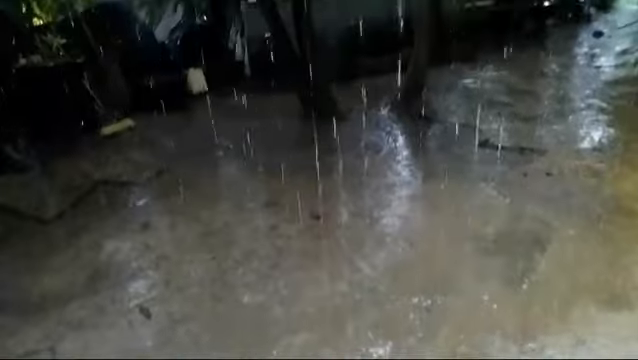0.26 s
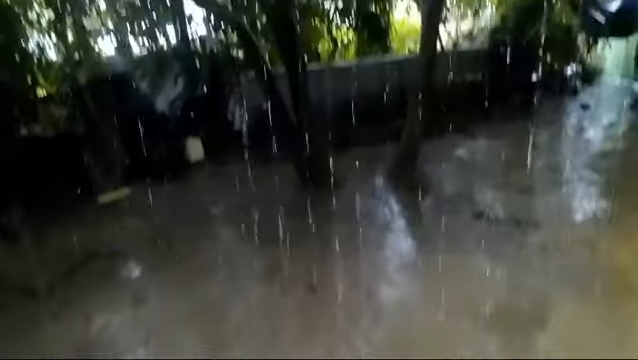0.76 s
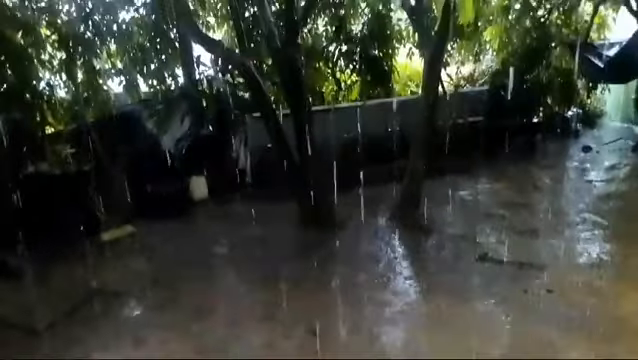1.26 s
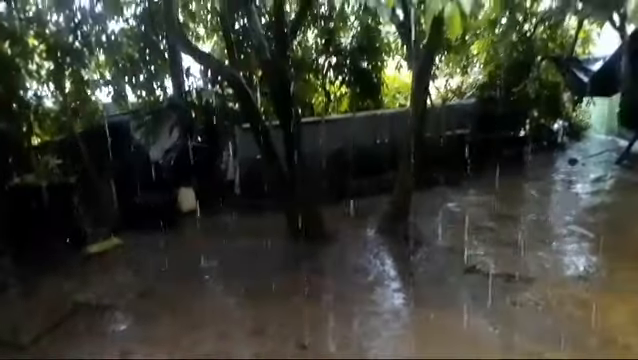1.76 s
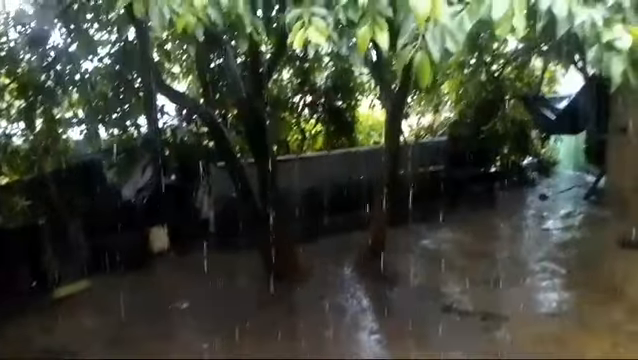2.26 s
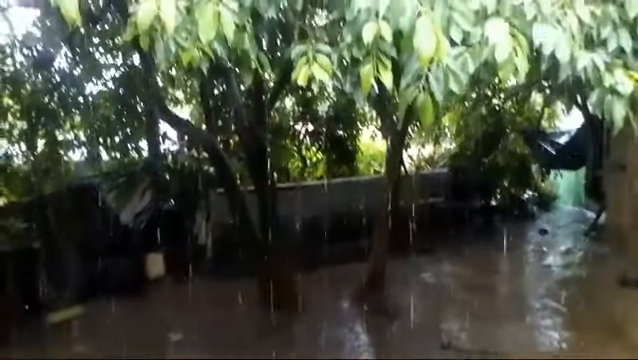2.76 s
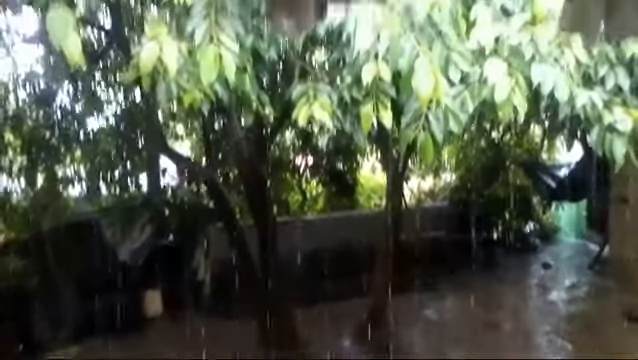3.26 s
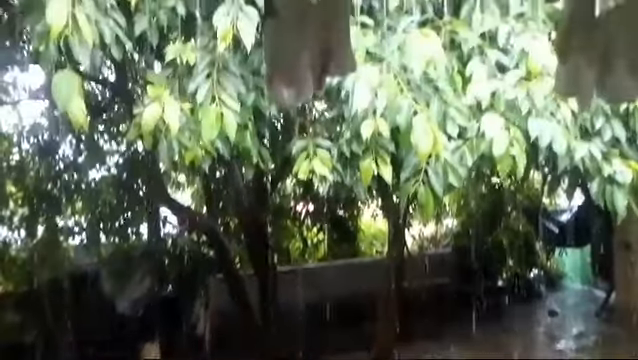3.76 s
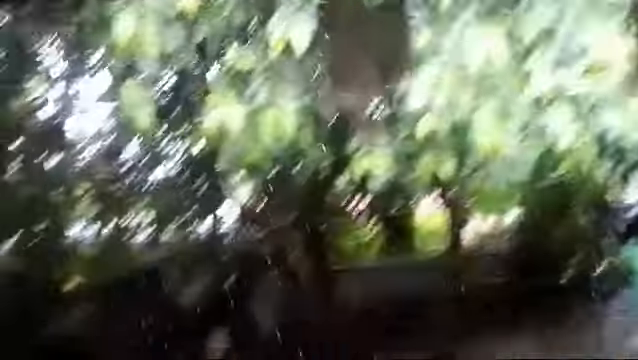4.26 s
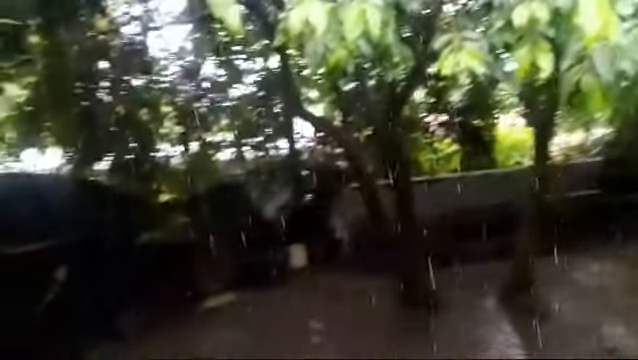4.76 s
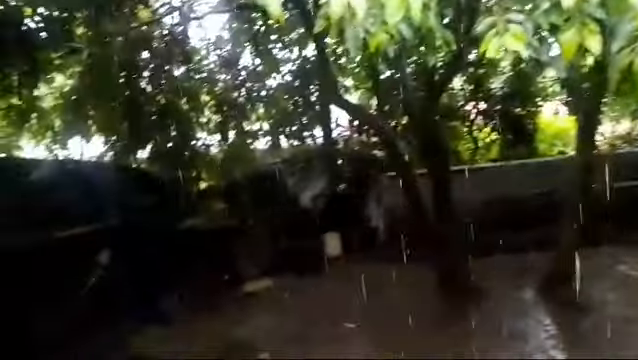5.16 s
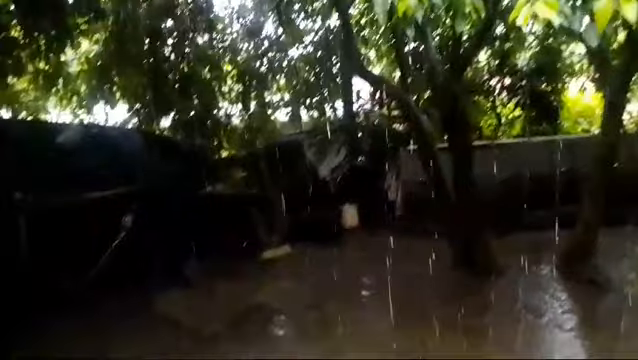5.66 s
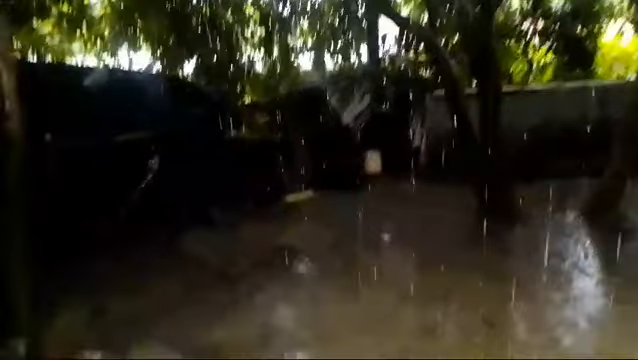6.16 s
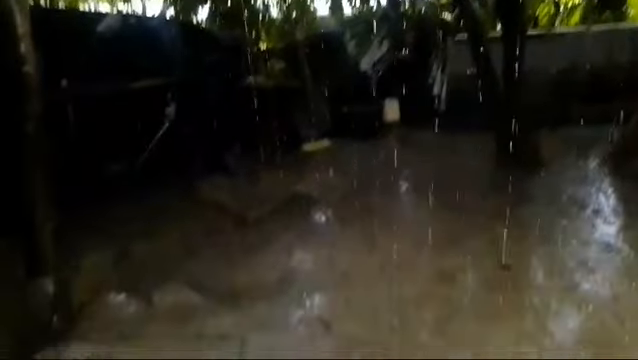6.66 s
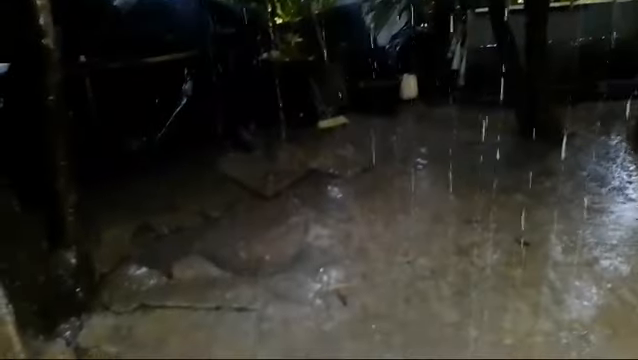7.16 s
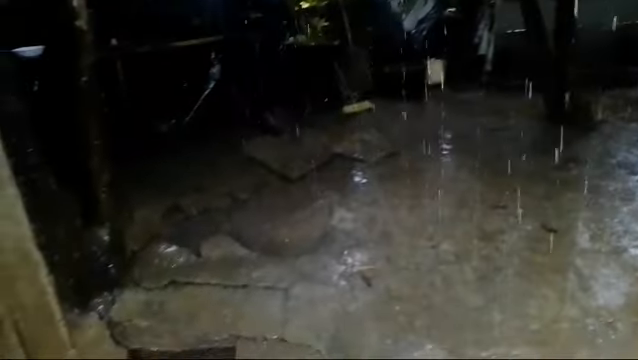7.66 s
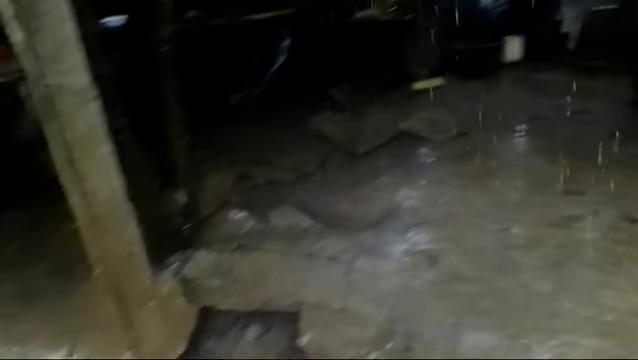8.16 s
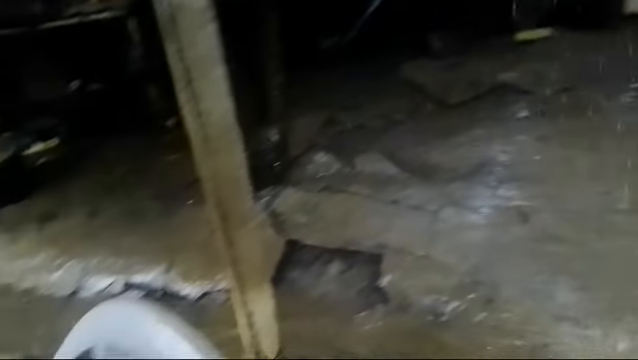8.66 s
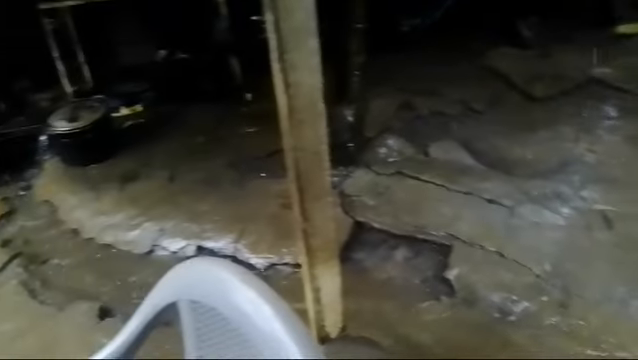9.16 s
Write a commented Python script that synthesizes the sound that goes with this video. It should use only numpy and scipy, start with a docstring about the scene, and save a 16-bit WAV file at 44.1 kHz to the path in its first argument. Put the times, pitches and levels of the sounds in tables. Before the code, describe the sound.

A continuous downpour in a wet yard under a dripping roof edge. Bright white hiss and fine patter fill everything, while nearer drops give sharp wet slaps, short pitched plops and tiny clicks at uneven moments. The small microphone sounds thin and treble-heavy, with shimmering, almost whistling streaks that rise and fade, and fluttering midrange bands strongest in the first half. The rain never stops.

```python
"""Strings of water falling from a roof edge close to a small microphone, in heavy rain on a flooded yard.
Close by: slaps of decaying noise through a treble resonance, plops of noise around a pitch, short ticks.
All round: far drops merge into noise hiss; nearer ones patter, plop and splat as clumps of damped sines.
Rain and slaps share one colour through the microphone; treble streaks and narrow midrange bands swell and fade."""
import sys
import numpy as np
from scipy import signal
from scipy.fft import rfft, irfft, next_fast_len
from scipy.io import wavfile
from scipy.ndimage import uniform_filter1d, map_coordinates

SR = 44100
rng = np.random.default_rng(int(sys.argv[2]) if len(sys.argv) > 2 else 0)


def gain_from_decibels(decibels):
    """Convert decibel values to linear amplitude factors."""
    exponent = np.asarray(decibels, float) / 20
    return 10 ** exponent


def wav_record(signal):
    """Record a signal, one row per channel, as 16-bit PCM in the file named by sys.argv[1]."""
    frames = np.transpose(np.atleast_2d(signal))
    bounded = np.clip(frames, -1, 1)
    # unit amplitude maps onto the largest positive 16-bit level
    quanta = np.round(bounded * 32767).astype(np.int16)
    wavfile.write(sys.argv[1], SR, quanta)


N = 415415

# Strength of the rain all round, before make-up gain: (t/s, relative level/dB)
RAIN_LEVEL = [(0.0, -52), (3.2, -52), (3.441, -51.5), (7.45, -53.5), (7.71, -53), (9.42, -54)]
# Colour of rain and slaps through the microphone, resonant near 8.5 kHz: (f/Hz, gain/dB)
MICROPHONE_COLOUR = [(32, -41), (44, -27), (60, -39), (100, -24.5), (155, -45), (200, -19.5), (310, -5.5),
                     (700, -4), (1200, -1), (1900, -0.5), (2600, -6), (3400, -7.5), (4700, -12),
                     (6300, -6.5), (7400, -1.5), (8600, -1.5), (10000, -3), (11500, -8), (15700, -13)]
# Course of the treble surges around the microphone's resonance: (t/s, lift/dB, centre f/Hz)
TREBLE_SURGES = [(0.0, 13.5, 8440), (0.34, 3, 8740), (0.63, 10, 8000), (0.83, 9.5, 9300), (1.0, 5.5, 8750),
                 (1.15, 9.5, 8250), (1.6, 11, 9000), (1.84, 14, 9000), (2.17, 10.5, 8500), (3.07, 3, 8730),
                 (3.67, 15, 9700), (4.14, 15.5, 9200), (4.36, 10.5, 8700), (4.42, 16.5, 8450),
                 (5.1, 8.5, 8930), (5.75, 12, 8760), (6.22, 7.5, 8300), (6.43, 12, 8500), (6.62, 7.5, 8450),
                 (6.93, 14, 8400), (7.26, 10, 7740), (7.75, 14.5, 8700), (8.16, 16, 8600),
                 (8.29, 10.5, 8600), (8.66, 10.5, 8540), (8.95, -1, 8700), (9.15, 6, 8650), (9.42, 3, 8400)]
# Strongest thin streaks inside the surges: (middle t/s, nominal length/s, f/Hz)
TREBLE_STREAKS = [(0.09, 0.18, 7300), (0.127, 0.26, 7770), (0.155, 0.39, 9170), (0.65, 0.41, 7920),
                  (0.84, 0.64, 9100), (1.3, 0.24, 8050), (1.65, 1.3, 9060), (1.72, 0.27, 9400),
                  (1.766, 3.3, 8530), (2.003, 0.19, 9260), (3.628, 0.43, 8190), (3.667, 0.64, 9340),
                  (3.682, 0.24, 9770), (3.8, 1.6, 9600), (3.89, 2.3, 8970), (4.19, 0.97, 8030),
                  (4.197, 1.4, 8670), (4.58, 0.38, 9320), (4.645, 0.58, 8260), (5.447, 0.23, 7020),
                  (5.674, 1.2, 8420), (5.682, 0.36, 9060), (6.473, 0.35, 9140), (6.74, 0.42, 7110),
                  (6.864, 0.52, 8220), (6.916, 0.53, 8630), (6.98, 0.34, 7900), (7.566, 1.8, 8750),
                  (7.61, 2.2, 8920), (7.71, 0.93, 7200), (7.89, 0.46, 7520), (7.886, 1.7, 8120),
                  (7.96, 0.45, 9160), (8.09, 0.33, 9350), (8.362, 0.81, 7820), (8.57, 0.68, 8630)]
# Narrow midrange swells of the rain noise: (middle t/s, length/s, f/Hz, lift/dB)
NARROW_SWELLS = [(0.018, 0.38, 1454, 11), (0.03, 0.22, 1910, 9), (0.254, 0.33, 2190, 9),
                 (0.547, 0.25, 1680, 5.5), (0.837, 0.15, 1740, 8.5), (0.9, 0.08, 1400, 8),
                 (1.262, 0.16, 2140, 6.5), (1.4, 0.11, 1760, 3), (1.427, 0.077, 1314, 6),
                 (1.707, 0.17, 1600, 9), (1.764, 0.16, 1220, 8), (2.28, 0.37, 1594, 13),
                 (2.58, 0.23, 1230, 12), (3.153, 0.28, 855, 9.5), (3.313, 0.25, 1844, 19),
                 (3.3, 0.3, 2160, 9), (3.378, 0.37, 1334, 14), (3.59, 0.19, 1744, 14.5),
                 (3.923, 0.18, 1254, 11), (4.035, 0.36, 1780, 14), (4.487, 0.37, 1790, 16),
                 (4.455, 0.062, 1500, 17.5), (4.26, 0.55, 1304, 8), (4.648, 0.2, 1435, 11),
                 (4.794, 0.25, 2160, 7), (4.81, 0.13, 1720, 16.5), (4.97, 0.26, 1770, 10),
                 (5.367, 0.34, 1540, 5.5), (5.785, 0.055, 1970, 8), (5.813, 0.11, 1380, 9),
                 (7.073, 0.15, 1550, 13.5), (7.432, 0.11, 1710, 8), (8.44, 0.2, 1720, 6.5),
                 (8.73, 0.1, 1400, 6), (8.816, 0.11, 1710, 1), (9.07, 0.064, 2110, 8)]
# Faint random swells all along, a single row: (centre f/Hz, width/Hz, lift/dB)
FAINT_SWELLS = (1500, 2060, -3)
# Loudest slaps in the treble spray, before the colour: (t/s, relative level/dB)
SLAPS = [(0.3826, -21), (1.0918, -23), (1.794, -18.5), (2.143, -19.5), (3.028, -21), (3.6023, -19),
         (3.7413, -16), (3.886, -20), (4.018, -33), (4.108, -19), (4.4105, -18.5), (4.443, -24),
         (4.55, -19.5), (4.7128, -21), (4.9944, -15), (6.3147, -20), (6.415, -19), (6.886, -22.5),
         (7.333, -22), (7.685, -24), (7.7126, -15.5), (7.877, -18), (7.964, -15), (8.1435, -23.5),
         (8.594, -23), (8.8034, -20)]
# Drops that plop into a puddle: (t/s, f/Hz, relative level/dB)
PUDDLE_PLOPS = [(1.135, 2490, -37.5), (1.638, 5800, -39.5), (2.143, 3460, -37), (2.529, 2480, -34),
                (2.563, 6000, -39), (3.003, 3800, -37), (3.028, 3730, -33.5), (4.369, 5840, -40.5),
                (4.5336, 4170, -35), (4.9696, 6300, -36), (4.9944, 4800, -36.5), (5.248, 3980, -38.5),
                (5.8574, 3950, -41), (6.171, 3300, -34), (6.311, 2600, -39), (6.448, 6380, -36),
                (6.565, 5900, -40.5), (7.024, 3680, -41), (7.592, 3120, -34), (7.713, 2420, -33.5),
                (7.83, 2260, -33.5), (7.863, 6270, -37), (8.128, 2560, -37)]
# Thin bright ticks of drops on hard ground: (t/s, relative level/dB)
GROUND_TICKS = [(0.612, -15), (0.85, -12), (1.131, -12), (3.504, -19), (6.209, -13), (6.291, -18),
                (6.373, -12), (6.8865, -16), (7.634, -10), (7.686, -13)]

# Widths in Hz of a surge and a narrow swell at 0 dB lift, and the Hz added for each dB of lift
SURGE_WIDTH, SURGE_WIDENS = 890, 91
SWELL_WIDTH, SWELL_WIDENS = 71, 6.1
STREAK_WIDTH = 260  # Hz
PLOP_WIDTH = 0.45  # resonance width over pitch
BURST_SAMPLES = SR // 12  # room for one close drop


def unit(x):
    """Scaled to rms 1."""
    return x / np.sqrt(np.mean(x ** 2) + 1e-20)


def wobble(rate):
    """A smooth random curve, rate knots a second."""
    knots = rng.standard_normal(int(N * rate / SR) + 4)
    return map_coordinates(knots, [np.arange(N) * rate / SR])


def filtered(x, response):
    """x times a response of frequency."""
    m = next_fast_len(N + 8192)
    return irfft(rfft(x, m) * response(np.fft.rfftfreq(m, 1 / SR)), m)[:N]


def resonance(centre_hz, width_hz):
    """Causal response of one resonance."""
    return lambda f: 1j * f * width_hz / (centre_hz ** 2 - f ** 2 + 1j * f * width_hz)


def whiten(x):
    """Evens out the long-term spectrum; used for the patter."""
    z = rfft(x)
    smooth_power = uniform_filter1d(abs(z) ** 2, size=6000)
    return unit(irfft(z / np.sqrt(smooth_power + 1e-9), N))


def grains(count, pitch_hz, spread, cycles, scatter_db, clumping):
    """Random drops as damped sines of log-normal pitch and uneven size, arriving in clumps."""
    when, chance = rng.random((2, count))
    hz = pitch_hz * np.exp(spread * rng.standard_normal(count))
    hz = np.clip(hz, 300, SR / 2.5)[:, None]
    # drops fall more often where the running crowd climbs faster
    crowd = np.cumsum(np.exp(clumping * np.tanh(wobble(30))))
    start = np.searchsorted(crowd, when * crowd[-1])[:, None]
    k = np.arange(160)  # samples in one drop
    turns = hz * k / SR
    size = gain_from_decibels(-scatter_db * np.log(chance + 0.015))[:, None]
    ringing = np.exp(-turns / cycles) * np.sin(2 * np.pi * turns)
    drops = size * np.sqrt(hz) * ringing
    return unit(np.bincount((start + k).ravel(), drops.ravel(), N + len(k))[:N])


def far_hiss():
    """Distant drops too many to tell apart: white noise."""
    return rng.standard_normal(N)


def patter():
    """Crisp small drops on wet ground: damped sines of about one cycle, with little bass."""
    drops = whiten(grains(count=16000, pitch_hz=7630, spread=0.466, cycles=0.9, scatter_db=4.0, clumping=1.8))
    return filtered(drops, lambda f: 1 / (1 + (2000 / (f + 1)) ** 2))


def rain_plops():
    """Rounder drops in the puddles: lower damped sines that ring for more cycles."""
    return grains(count=4000, pitch_hz=3800, spread=0.554, cycles=5.7, scatter_db=-0.5, clumping=0.8)


def fat_splats():
    """Scattered fat drops: few damped sines of very uneven size."""
    return grains(count=300, pitch_hz=5240, spread=0.34, cycles=3.5, scatter_db=3.5, clumping=1.5)


def rain():
    """Sums the rain from far to near; one gusty level carries them all."""
    s, level_db = np.transpose(RAIN_LEVEL)
    gusts_db = np.interp(np.arange(N) / SR, s, level_db) + 0.2 * wobble(7.9)
    drops = gain_from_decibels(-2.5) * patter() + gain_from_decibels(-11.5) * rain_plops() + gain_from_decibels(-17.0) * fat_splats()
    return gain_from_decibels(gusts_db + 13) * (far_hiss() + drops)  # 13 dB make-up gain


def patches(shape, bins, frames):
    """Random rms-1 patches over frequency and time, smoothed over so many bins and frames."""
    smooth = uniform_filter1d(rng.standard_normal(shape), bins, 0)
    return unit(uniform_filter1d(smooth, frames, 1))


def around(f, hz, width):
    """A flat-topped band around hz."""
    return np.exp(-(2 * (f - hz) / width) ** 4)


def treble_surges(f, t, streak_db):
    """Power added around the microphone's resonance, drawn out into long thin streaks."""
    s, *columns = np.transpose(TREBLE_SURGES)
    lift_db, centre_hz = [np.interp(t, s, c) for c in columns]
    band = around(f, centre_hz, SURGE_WIDTH + SURGE_WIDENS * lift_db)
    strong = np.zeros(band.shape)
    for s, length, hz in TREBLE_STREAKS:
        strong += around(f, hz, STREAK_WIDTH) * np.exp(-(1.7 * (t - s) / length) ** 2)
    contrast = np.tanh(0.42 * patches(band.shape, 3, 60) + 1.84 * strong - 0.6)
    streaky = (band + 0.41 * strong) * gain_from_decibels(2 * streak_db * contrast)
    # each moment keeps the power of the smooth band
    return gain_from_decibels(2 * lift_db) * streaky * band.sum(axis=0) / streaky.sum(axis=0)


def narrow_swells(f, t, flutter_db):
    """Power added in short narrow swells with quick flutter, and in faint random strands."""
    shape = (len(f), len(t))
    flutter = gain_from_decibels(2 * flutter_db * patches(shape, 5, 3))
    flutter /= flutter.mean()
    power = np.zeros(shape)
    for s, length, hz, lift_db in NARROW_SWELLS:
        rise_and_fall = np.exp(-(2 * (t - s) / length) ** 2)
        width = SWELL_WIDTH + SWELL_WIDENS * lift_db
        core_and_skirt = around(f, hz, width) + 0.086 * around(f, hz, 3 * width)
        power += gain_from_decibels(2 * lift_db) * core_and_skirt * rise_and_fall * flutter
    hz, width, lift_db = FAINT_SWELLS
    strands = np.clip(patches(shape, 3, 16) - 0.5, 0, 1.5) ** 2
    return power + gain_from_decibels(2 * lift_db) * around(f, hz, width) * strands


def swelling(x, streak_db, fine_db, patchy_db, flutter_db):
    """Lifts surges and narrow swells by gain over time and frequency; small patches flicker everywhere."""
    f, t, z = signal.stft(x, SR, nperseg=768)
    f = f[:, None]
    power = 1 + treble_surges(f, t, streak_db) + narrow_swells(f, t, flutter_db)
    # the fine flicker is deepest where the lift is strongest
    fine = fine_db * (1.3 - 1 / power) * patches(z.shape, 2, 16)
    flicker_db = fine + patchy_db * patches(z.shape, 12, 5)
    return signal.istft(z * np.sqrt(power) * gain_from_decibels(flicker_db), SR, nperseg=768)[1][:N]


def fading_noise(fade_s):
    """Noise that decays by 60 dB in fade_s."""
    t = np.arange(BURST_SAMPLES) / SR
    return rng.standard_normal(BURST_SAMPLES) * gain_from_decibels(-60 * t / fade_s)


def place(track, s, burst):
    """Adds one close drop to the track at s seconds."""
    start = round(s * SR)
    track[start:start + len(burst)] += burst


def ground_ticks():
    """Drops on hard ground: a click and a very short noise tail through a broad treble resonance."""
    track = np.zeros(N + BURST_SAMPLES)
    for s, db in GROUND_TICKS:
        tick = 0.083 * fading_noise(0.012)
        tick[0] = 1
        place(track, s, gain_from_decibels(db) * tick)
    return filtered(track, lambda f: resonance(8000, 10000)(f) ** 2)


def puddle_plops():
    """Close drops in a puddle: noise splashes resonating around a pitch, with a ragged longer tail."""
    track = np.zeros(N + BURST_SAMPLES)
    f = np.fft.rfftfreq(BURST_SAMPLES, 1 / SR)
    for s, hz, db in PUDDLE_PLOPS:
        noise = rng.standard_normal(BURST_SAMPLES)
        t = np.arange(BURST_SAMPLES) / SR
        splash = noise * (1.8 * gain_from_decibels(-60 * t / 0.025) + 0.6 * gain_from_decibels(-60 * t / 0.3))
        splash[0] = 4  # first contact
        ring = resonance(hz, PLOP_WIDTH * hz)(f) ** 2
        place(track, s, gain_from_decibels(db) * irfft(rfft(splash) * ring, BURST_SAMPLES))
    return track[:N]


def roof_slaps():
    """Water from the roof edge slaps down: sharp contact, then fast and slow spray in a treble resonance."""
    track = np.zeros(N + BURST_SAMPLES)
    t = np.arange(BURST_SAMPLES) / SR
    for s, db in SLAPS:
        noise = rng.standard_normal(BURST_SAMPLES)
        spray = noise * (0.17 * gain_from_decibels(-60 * t / 0.015) + 0.08 * gain_from_decibels(-60 * t / 0.17))
        spray[0] = 4  # the sharp first contact
        place(track, s, gain_from_decibels(db) * spray)
    return filtered(track, lambda f: resonance(8800, 3200)(f) ** 2)


def scene():
    """Rain and slaps share one colour and swell together; plops and ticks stand just in front."""
    hz, db = np.transpose(MICROPHONE_COLOUR)
    colour = lambda f: gain_from_decibels(np.interp(np.log(f + 1), np.log(hz), db))
    coloured = filtered(rain() + roof_slaps(), colour)
    swollen = swelling(coloured, streak_db=9.5, fine_db=2.32, patchy_db=0.99, flutter_db=0.5)
    close = filtered(puddle_plops() + ground_ticks(), lambda f: (1j * f / (500 + 1j * f)) ** 2)  # less bass
    return (swollen + close)[None]


def band_limit(x):
    """A steep low-pass at the top of the band."""
    return signal.sosfilt(signal.butter(12, 15910, fs=SR, output="sos"), x)


def record(dry):
    """Stops everything above the band limit of 15750 Hz and returns the finished mix."""
    mix = filtered(dry[0], lambda f: f < 15750)[None]
    return band_limit(mix)


dry = scene()
out = record(dry)
wav_record(out)
```